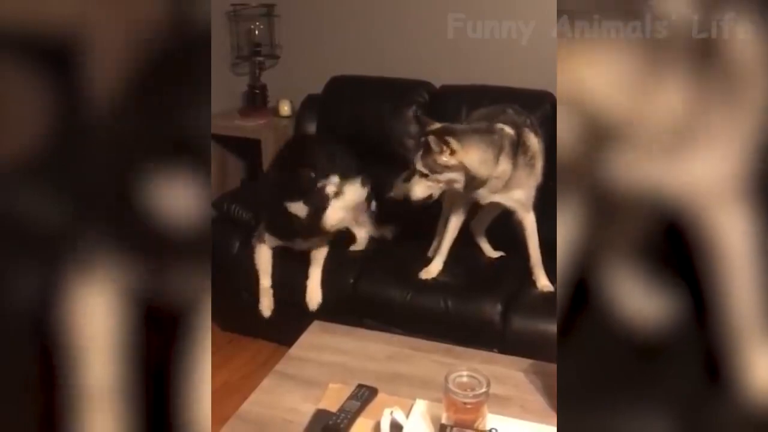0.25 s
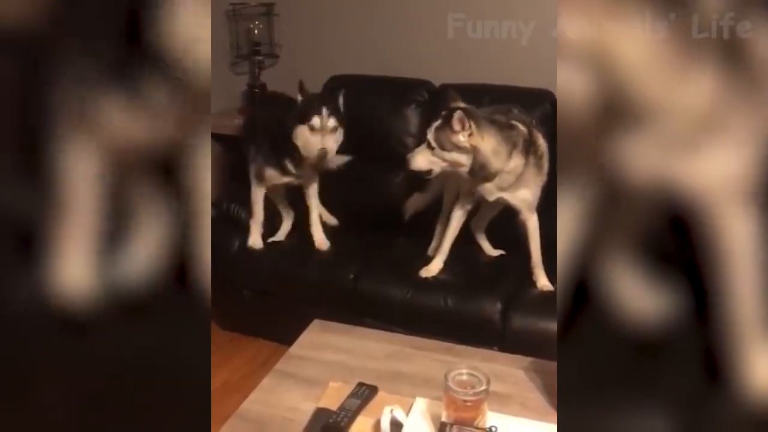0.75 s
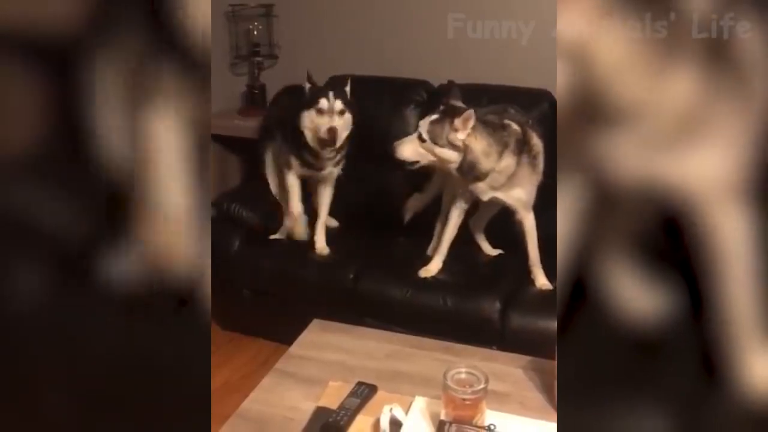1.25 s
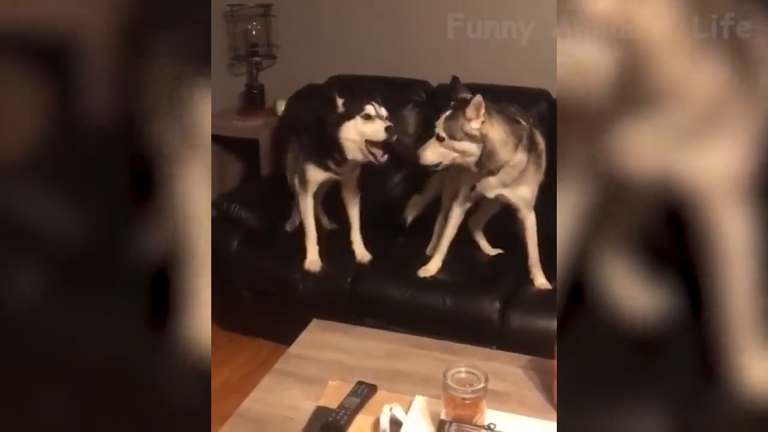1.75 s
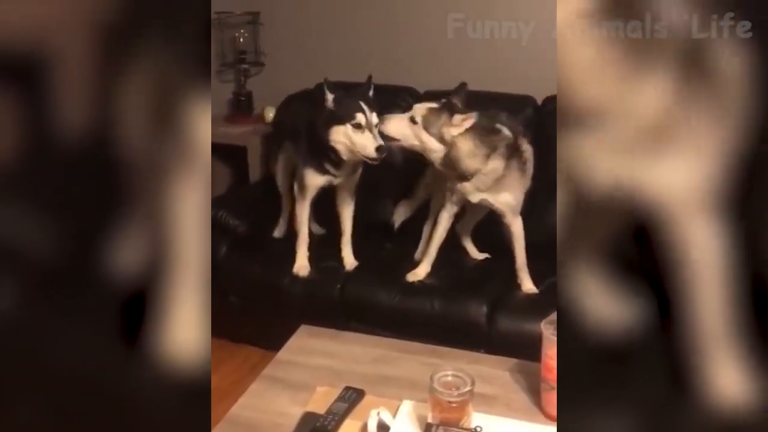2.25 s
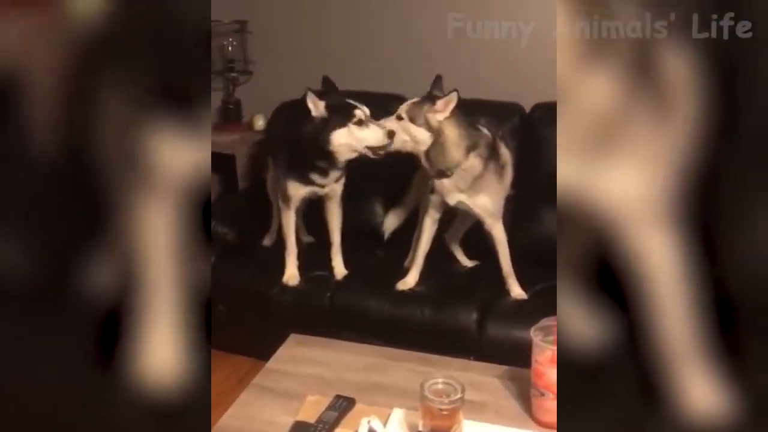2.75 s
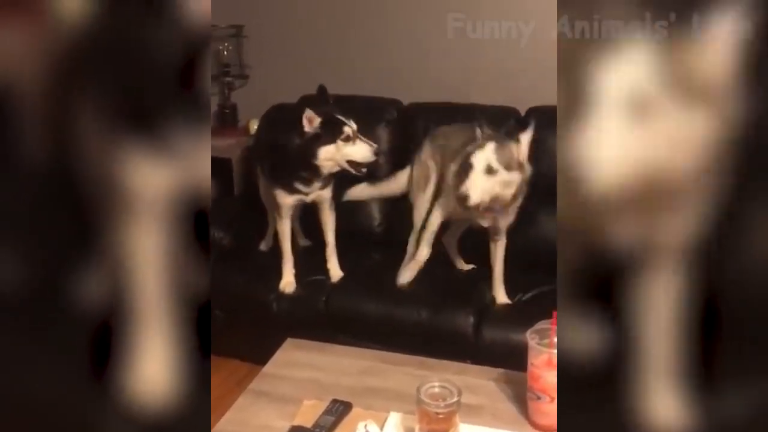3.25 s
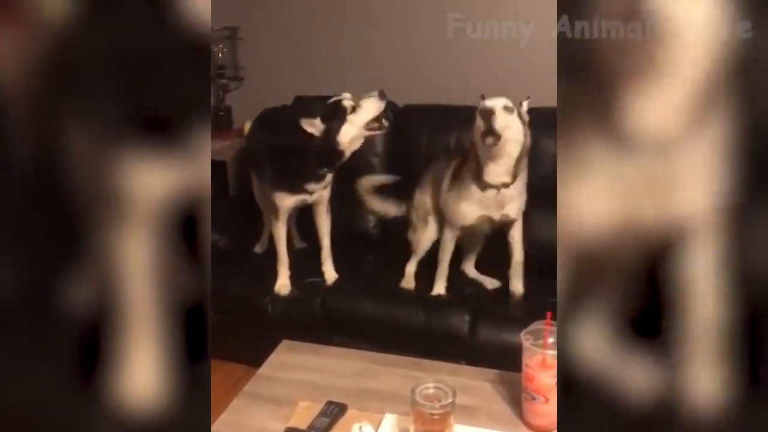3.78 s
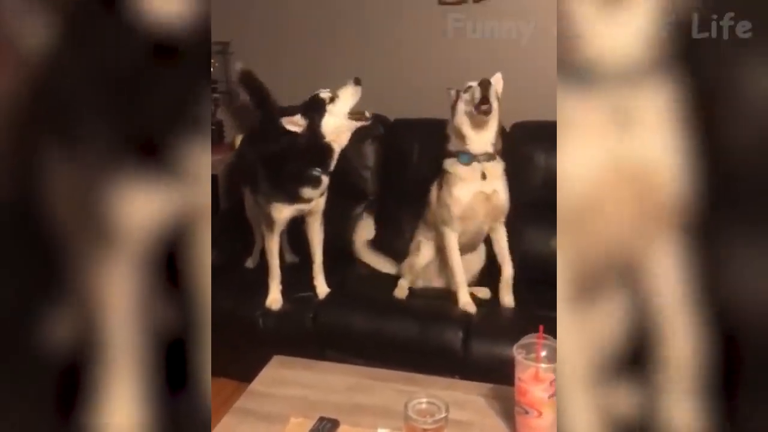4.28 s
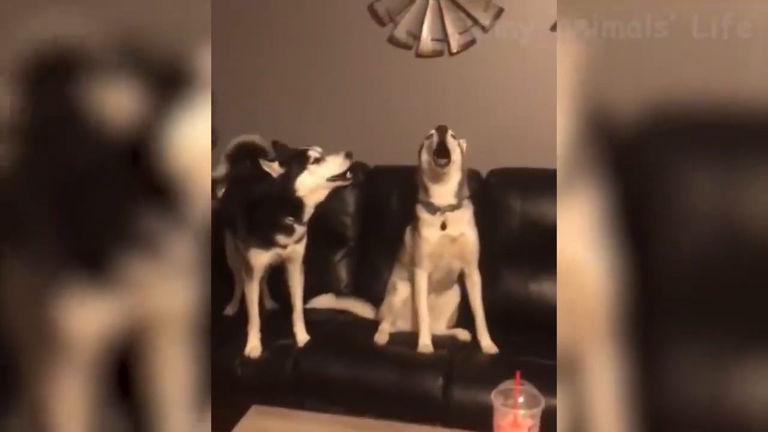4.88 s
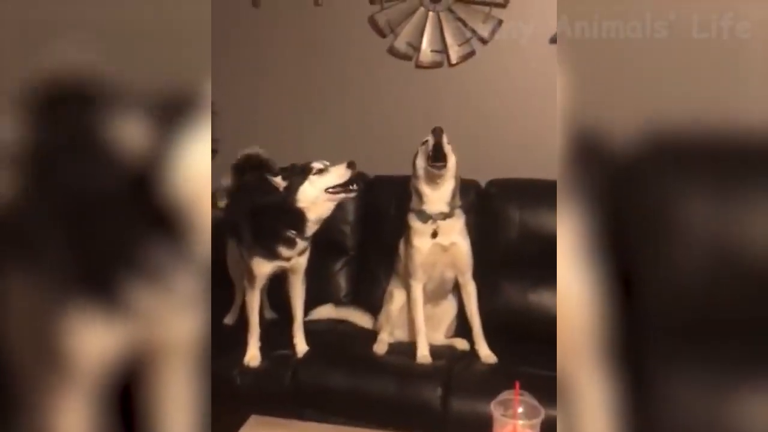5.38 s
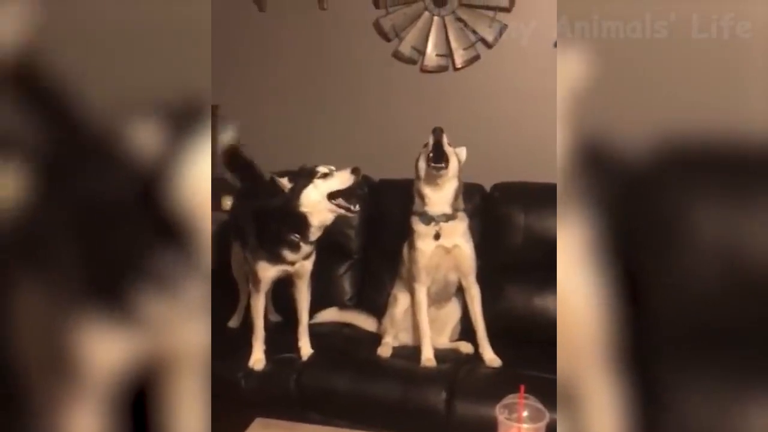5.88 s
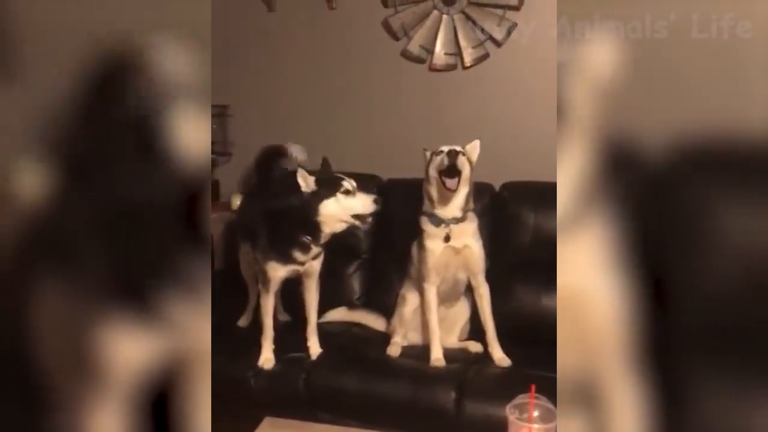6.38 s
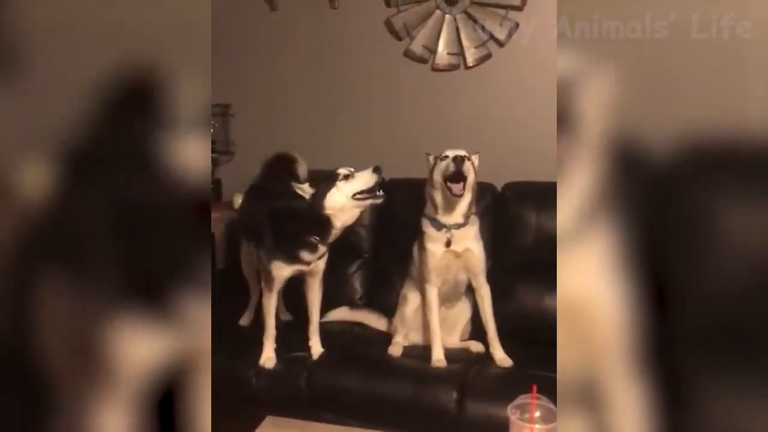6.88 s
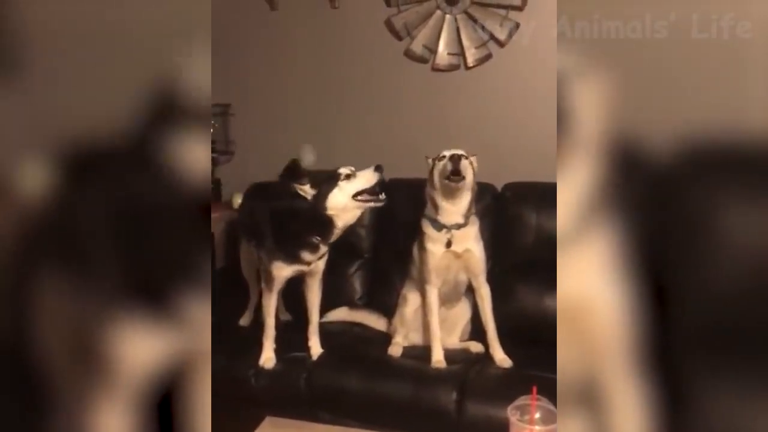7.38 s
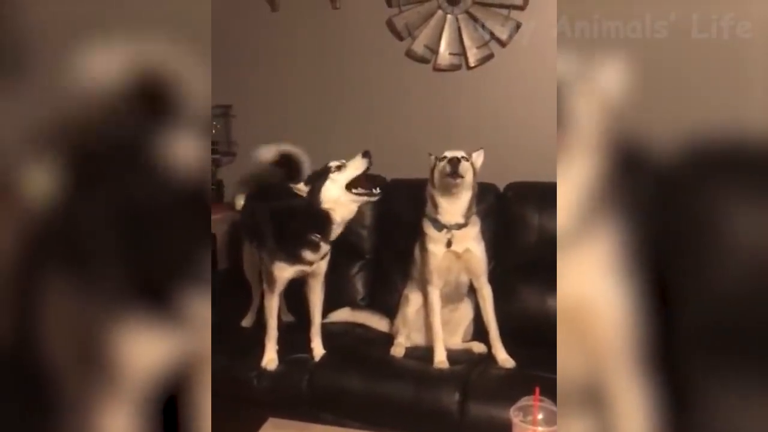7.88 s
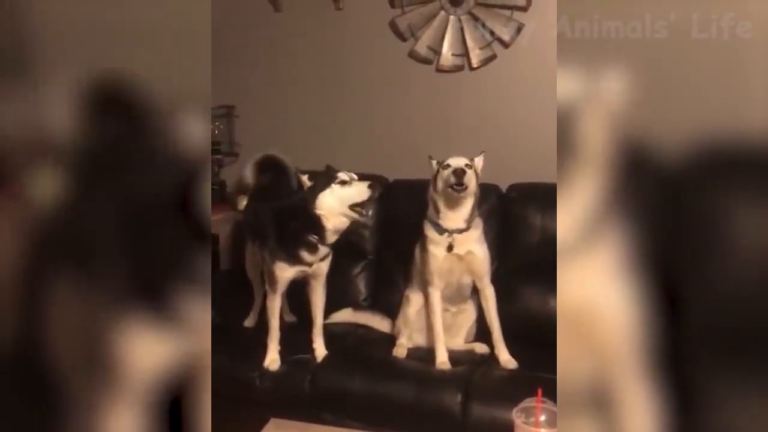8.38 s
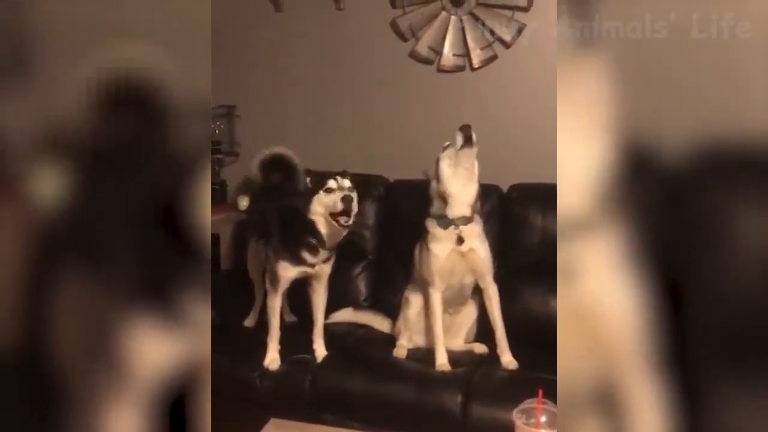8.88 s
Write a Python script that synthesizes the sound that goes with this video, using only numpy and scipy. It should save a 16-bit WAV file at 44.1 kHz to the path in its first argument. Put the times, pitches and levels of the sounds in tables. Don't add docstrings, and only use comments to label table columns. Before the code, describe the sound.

Close indoor sound of two excited dogs calling. Separate sharp yelps and husky snarls come first, with small gaps and a few thin whines. Then nearly continuous howling overlaps, a bright high voice arching above a lower, growly, unsteady one, each howl starting with a raspy bark. It breaks into closing yaps. Short room reverberation, very faint paw thuds on cushions, and loud peaks slightly squashed.

```python
import sys
import numpy as np
from scipy import signal
from scipy.fft import rfft, irfft, next_fast_len
from scipy.io import wavfile
from scipy.ndimage import uniform_filter1d, minimum_filter1d

SR = 44100
rng = np.random.default_rng(int(sys.argv[2]) if len(sys.argv) > 2 else 0)


def dump_mix(stems):
    frames = np.atleast_2d(stems).T
    limited = np.clip(frames, -1, 1)
    pcm = np.round(limited * 32767).astype(np.int16)
    wavfile.write(sys.argv[1], SR, pcm)


def natural_amplitude(level_db):
    exponent = np.asarray(level_db, float) / 20
    return 10 ** exponent


N = 403074

# (time [s], pitch [Hz], effort [dB])
CAUGHT_YELPS = [
    [(-.02, 620, -52), (0.001, 610.1, -40), (.02, 674, -29.5), (.034, 708, -40), (.048, 697, -32),
     (.076, 710, -32), (.1, 707, -47.5), (.14, 690, -64)],
    [(.81, 502.2, -31), (.836, 641, -30.5), (.86, 642, -35), (.9, 685, -33), (.935, 681, -41),
     (.965, 702.7, -60)],
    [(2.62, 478.4, -36), (2.65, 509, -28), (2.667, 593.4, -27), (2.68, 683, -26), (2.715, 687.3, -26.5),
     (2.76, 691, -28), (2.8, 695.5, -61)],
    [(.42, 539, -39), (.45, 644, -36), (.47, 695, -33), (.5, 698, -37), (.53, 687, -44), (.57, 681, -53)],
]
# (start [s], length [s], top pitch [Hz], last pitch [Hz], effort [dB])
SHORT_YELPS = [
    (1.39, 0.15, 686, 683.7, -22),
]
# (time [s], pitch [Hz], effort [dB])
WHIMPERS = [
    [(1.62, 624, -36.5), (1.664, 699, -30.5), (1.73, 736, -31.5), (1.87, 626, -49)],
    [(1.85, 625, -36), (1.938, 769.7, -26), (1.984, 755, -33.5), (2.06, 535, -42)],
    [(2.04, 594, -39), (2.108, 509, -47.5), (2.2, 523.5, -34.5), (2.266, 523.5, -27.5), (2.34, 508.7, -44)],
    [(3.28, 506.4, -64), (3.332, 621.7, -41), (3.37, 628, -33.5), (3.43, 609.7, -34), (3.49, 667, -23),
     (3.52, 708, -25), (3.54, 830.3, -18.5), (3.6, 831, -29), (3.66, 823, -46)],
]
# (time [s], pitch [Hz], effort [dB])
ARCHED_HOWLS = [
    [(3.79, 540, -21), (3.812, 650.5, -32.5), (3.826, 756.2, -32), (3.902, 793.4, -46), (3.982, 821, -44),
     (4.098, 850, -32), (4.2, 832, -41), (4.3, 765, -44.5)],
    [(4.44, 619.6, -29), (4.47, 641.8, -24.5), (4.515, 652, -22.5), (4.535, 776.6, -29), (4.62, 818.5, -38),
     (4.722, 867.6, -31), (4.924, 824.3, -42.5), (5.02, 855.6, -42)],
    [(5.125, 580.8, -34), (5.145, 651, -33.5), (5.19, 649.7, -31), (5.205, 771, -28.5),
     (5.27, 822.5, -39.5), (5.442, 870, -28.5), (5.546, 838, -32), (5.608, 786.3, -34.5),
     (5.73, 748, -42.5)],
    [(5.865, 583.7, -16), (5.88, 665.6, -22.5), (5.9, 673.5, -28), (5.912, 765, -24.5), (6.0, 795, -37),
     (6.1, 838.7, -30.5), (6.212, 859, -27.5), (6.382, 817, -32), (6.44, 666, -29.5)],
    [(7.79, 605.5, -28), (7.824, 640.7, -29.5), (7.87, 722, -34.5), (7.96, 775, -36.5),
     (8.074, 847.8, -28.5), (8.2, 829, -30), (8.32, 814, -28.5), (8.4, 782, -38.5), (8.44, 644, -34)],
]
# (time [s], pitch [Hz], effort [dB])
LONG_HOWL = [
    (6.6, 532.7, -34),
    (6.62, 664.2, -24.5),
    (6.7, 781.6, -34.5),
    (6.93, 847.5, -29),
    (7.15, 730.4, -32.5),
    (7.252, 769.6, -26.5),
    (7.266, 687.7, -28.5),
    (7.42, 674, -28.5),
    (7.55, 699.7, -24),
    (7.66, 660, -34),
]
# (time [s], pitch [Hz], effort [dB])
LAST_YAPS = [
    [(8.58, 499, -46), (8.61, 636.6, -24.5), (8.64, 711.5, -27.5), (8.69, 719.5, -38), (8.75, 739.6, -34.5),
     (8.8, 687.8, -45.5), (8.83, 668, -17)],
    [(8.81, 674.6, -46), (8.85, 685.7, -22.5), (8.875, 735.6, -21), (8.895, 823, -26.5), (8.94, 713, -25.5),
     (9.03, 676.7, -42.5), (9.1, 613, -47), (9.14, 685.5, -21)],
]
# (start [s], length [s], top pitch [Hz], last pitch [Hz], effort [dB])
GRUNTS = [
    (1.52, .32, 440, 380.6, -45.5),
    (8.84, 0.28, 562.9, 521, -23),
]
# (time [s], pitch [Hz], effort [dB])
SNARLS = [
    [(.15, 279.2, -51), (.21, 371.5, -41.5), (.27, 413, -49), (.33, 397.4, -40.5), (.38, 348, -38.5),
     (.43, 335, -53)],
    [(1.12, 270, -16), (1.145, 289.7, -26.5), (1.185, 415, -27.5), (1.22, 437.1, -21.5), (1.28, 414.7, -30),
     (1.36, 401, -33), (1.41, 392.5, -27.5)],
    [(2.27, 272.3, -36), (2.3, 330.5, -34.5), (2.33, 419.7, -31.5), (2.38, 434, -31), (2.43, 400.2, -31.5),
     (2.5, 383.9, -53), (2.56, 379.7, -48)],
]
# (time [s], pitch [Hz], effort [dB])
RISING_HOWLS = [
    [(2.92, 270.2, -27), (2.97, 344, -28), (3.02, 409.4, -23), (3.1, 414, -28.5), (3.15, 452.7, -25.5),
     (3.28, 460.5, -19), (3.33, 427.5, -24), (3.4, 405.4, -24), (3.47, 419.5, -30)],
    [(3.44, 415.8, -48), (3.5, 485.7, -16), (3.56, 505, -18), (3.66, 511.7, -42.5), (3.705, 488.8, -29),
     (3.73, 458.6, -24.5), (3.83, 487.5, -21.5), (3.9, 451.6, -43.5), (4.0, 414, -39)],
    [(4.0, 410.3, -27.5), (4.06, 547.8, -35), (4.19, 566.4, -48.5), (4.27, 453.2, -32.5),
     (4.35, 443.6, -35), (4.41, 459, -22.5), (4.47, 444.8, -38)],
    [(4.45, 447.6, -27), (4.6, 449.4, -26), (4.75, 436.3, -32), (4.85, 437, -32.5), (4.97, 457.7, -24),
     (5.07, 478, -21.5), (5.17, 488.1, -24), (5.26, 425.7, -37.5), (5.42, 434.2, -20.5)],
]
SINKING_HOWLS = [
    [(5.45, 432.2, -12), (5.52, 412.8, -28), (5.732, 413.5, -39.5), (5.778, 455, -34.5), (5.87, 473, -17.5),
     (5.924, 432, -45), (6.058, 481.8, -25.5), (6.47, 425, -32), (6.62, 448.4, -26)],
    [(6.68, 406.6, -32.5), (6.91, 419.6, -32), (6.94, 390, -29), (7.03, 352.9, -29.5), (7.3, 379.6, -30),
     (7.526, 374.9, -40.5), (7.606, 343, -41), (7.722, 369.4, -30.5), (7.78, 494.2, -19.5),
     (7.9, 479.6, -28)],
]
# (time [s], pitch [Hz], effort [dB])
HUM = [
    (7.88, 384.7, -45),
    (7.93, 372, -43),
    (8.0, 362.3, -56),
    (8.06, 362, -58),
]

HIGH_ROUGHNESS = [.8, 2.8, 3., .8, 2.2, .9, .5, .4, 1.2, 1.5, .7, .55, .45, .13, .4, 1.4, 1.]
LOW_ROUGHNESS = [2., 1., 1.2, 1., 1.2, .7, .9, .9, .7, .7, .7, .6]
# (start [s], end [s], depth [1])
HIGH_GROWLS = [(0.091, 0.084, 0.076), (0.816, 0.89, 0.17), (1.449, 1.58, 0.18), (1.688, 1.84, 0.069),
               (2.622, 2.7, 0.5), (3.542, 3.75, 0.31), (3.826, 4.44, 0.099), (4.485, 4.82, 0.24),
               (5.195, 5.26, 0.13), (5.904, 5.957, 0.079), (6.63, 6.68, 0.13), (7.84, 7.48, 0.97),
               (8.61, 8.78, 0.13), (8.858, 9.6, 0.15)]
LOW_GROWLS = [(0.255, 0.415, 0.52), (1.202, 1.346, 0.14), (1.524, 1.832, 2.44), (2.351, 2.56, 0.99),
              (2.915, 3.08, 0.54), (3.327, 3.468, 0.4), (3.588, 3.714, 1.03), (3.898, 4.038, 0.61),
              (4.426, 4.767, 0.78), (5.039, 5.165, 0.77), (5.431, 5.758, 0.45), (6.032, 6.2, 0.24),
              (6.413, 6.596, 0.14), (6.935, 7.063, 0.074), (7.378, 7.574, 0.26), (8.901, 8.981, 0.13)]
HIGH_CLOSED = [16, 9, 6, 12, 6, 9, 2, -6.5, -3.5, 8.5, 3, 0, 7, -0.5, -3.5, 5.5, -8.5]
LOW_CLOSED = [-2.5, -2, 9, 2, 6.5, 2.5, 7, -1, 2, -5, -12, 3]
# (pitch [Hz], level over the effort [dB])
HIGH_FIRST = [(520, -4.5), (640, -4.5), (700, 3), (780, 11.5), (825, 11), (870, 0.5)]
LOW_FIRST = [(300, -14), (400, -8), (450, -8), (490, -11), (570, 17)]
# (frequency [Hz], level [dB])
HIGH_MOUTH = [(1800, 10.5), (2600, 8.5), (3300, -9), (3900, -23), (4600, -24.5), (6200, -16), (8500, -25),
              (11500, -29.5)]
LOW_MOUTH = [(1000, 2), (1300, -2.5), (1800, -8), (2600, -2.5), (3200, -21), (3900, -32.5), (6000, -28.5),
             (11500, -51.5)]
# (time [s], level [dB])
HIGH_MUZZLE = [(3.3, -33), (3.57, 3), (3.839, 3.5), (3.952, 2.5), (4.3, -5), (4.5, -11), (4.92, 9),
               (5.02, -8), (5.27, -6), (5.56, 5.5), (5.9, -10), (6.38, -10), (6.65, 3.5), (7.2, 2),
               (7.41, -9.5), (7.831, 11), (8.07, -6), (8.31, 0.5)]
LOW_MUZZLE = [(2.4, -13), (3.0, 3), (3.192, -1), (3.5, -8), (3.8, 7.5), (4.15, 9.5), (4.36, 14),
              (4.55, -17.5), (4.85, 8), (5.1, -7), (5.45, -7), (5.75, 2), (5.92, -5.5), (6.1, -7), (6.6, 6),
              (6.8, 8), (7.101, 2), (7.7, 15.5)]
# (time [s], level [dB])
HIGH_GAPE = [(1.901, 1), (2.1, -8.5), (2.3, -19.5), (3.3, 16.5), (3.5, -5.5), (3.9, 4), (4.2, 4), (4.5, -3),
             (4.9, 4), (5.3, 2), (5.7, 2.5), (6.2, -2.3), (6.8, -4.5), (7.3, -3), (7.6, -3), (8.1, -1.5),
             (8.65, -3), (9.0, -9)]
LOW_GAPE = [(.3, 7), (1.15, 6.5), (1.3, -2), (2.35, 2), (3.0, 0.5), (3.201, -4.5), (3.5, 12), (3.8, -5.5),
            (4.35, -6), (4.6, -16), (4.9, -8), (5.3, -6), (5.8, 1.5), (6.3, -4.5), (6.9, -0.5), (7.4, -1),
            (7.77, -3.5), (9.0, -3)]

# (time [s], peak level [dB], length [s])
BARKS = [(.0094, -9.5, 0.03), (0.195, -15, 0.19), (0.417, -17, 0.12), (0.79, -5.5, 0.11),
         (1.132, -2.5, 0.15), (1.364, -2.5, 0.15), (1.648, -12, 0.073), (2.308, -2.5, 0.11),
         (2.623, 1, 0.086), (2.908, -10, 0.16), (3.266, -5.5, 0.084), (3.47, -7.5, 0.25), (3.801, 2, 0.065),
         (4.045, -16, 0.2), (4.438, -1.5, 0.083), (4.634, -20, 0.082), (5, -4.5, 0.2), (5.151, -4, 0.082),
         (5.426, -25, 0.14), (5.691, -18, 0.095), (5.86, -4.5, 0.1), (6.373, -26, 0.17),
         (6.575, -1.5, 0.12), (6.928, -32, 0.076), (7.334, -16, 0.061), (7.7746, 1, .11),
         (8.371, -41, 0.085), (8.559, -3.5, .13), (8.826, -6, 0.15), (9.087, -15, 0.12)]
BURST_HISS = [-44, -54, -89, -46, -63, -31.5, -59, -58.5, -34, -59, -58, -44.5, -51, -68, -52.5, -41.5, -45,
              -59, -64, -50.5, -42.5, -49, -39.5, -74, -51, -42.5, -52, -46, -37, -42]
BURST_BRIGHT = [7, -6.5, 2.5, 0, -4, 3.5, 5.5, -12.5, 2, -3, -5.5, -17, -0.5, 2, -7.3, -21, -17, -3, 3, 1,
                -1.5, -3, -4, -1, -3, -6, 25, -2.5, -1, 4]
# (frequency [Hz], width [Hz], level [dB])
THROAT = [(668, 102, 3.5), (1184, 262, 1), (1930, 188, -0.5), (2538, 165, -1.5), (3310, 640, -12.5)]
# (frequency [Hz], density [dB per Hz])
HISS = [(2120, -54.5), (3600, -26.5), (3940, 12.5), (4370, 3.5), (4880, 1), (6290, 10), (7330, 0),
        (12100, -3), (15700, -60), (22000, -120)]
# (time [s], level [dB], length [s])
LUNGES = [(.0094, -37, 0.07), (0.44, -50, 0.088), (0.81, -40, 0.098), (1.402, -30.5, 0.1),
          (2.602, -34, 0.15), (3.3, -60, 0.11), (3.494, -48, 0.19), (3.802, -37.5, 0.13),
          (5.88, -41, 0.067), (6.616, -44, 0.13), (7.787, -38.5, 0.14), (8.843, -35, 0.093)]
# (time [s], length [s], first frequency [Hz], last frequency [Hz], level [dB])
NOSE = [
    (1.41, .09, 4650, 4150, -31),
    (2.64, .08, 4350, 4200, -40),
    (.84, .07, 4400, 4300, -47),
    (1.67, .07, 4350, 4300, -48),
]
# (time [s], frequency [Hz])
POCKET = [(.15, 3800), (.9, 3860), (1.2, 3480), (1.36, 3560), (1.43, 4066), (2.1, 4070), (2.3, 3477),
          (2.45, 3700), (3.0, 4000), (3.45, 3632), (4.4, 3640), (5.1, 3730), (5.74, 3506), (6.2, 3713),
          (7.0, 3653), (7.7, 3694), (8.4, 3625), (8.7, 4037)]
# (frequency [Hz], time [s])
ROOM_T60 = [(200, 0.72), (700, 0.45), (2500, 0.43), (6000, 0.35), (11000, 0.24)]
# (middle [s], level [dB], spread [s])
SHUFFLES = [
    (1., -67.5, 0.93),
    (2.5, -68.5, 0.62),
    (3.45, -63, 0.57),
    (4.7, -71, 0.3),
    (6.7, -81, 0.18),
    (7.8, -74.5, 0.72),
]
# (frequency [Hz], density [dB per Hz])
AIR = [(30, -16), (100, -2.5), (300, -11.5), (1000, 6.5), (3000, -9), (10000, -37)]

SCOOP, RISE_S, ONSET_DB = .27, .035, -1
HOLD, HOLD_DB, RELEASE_DB = .65, -5, -30
CRACK_ROUGH, CRACK_S = 1.5, .06
GLIDE_S = .02
BRIGHTEN, BRIGHT_FROM_DB = .11, -34.5
HIGH_ORDER, LOW_ORDER = .2, .7
LOW_SMEAR = .65
RASP_SPLIT_HZ = 1380
STREAK_DB = -8.5
HISS_PATCH_DB = 3
BURST_RISE = .7
NOSE_WIDTH_HZ, POCKET_WIDTH_HZ = 81, 440
ROOM_DB, AIR_DB = -5, -57
CREAK_DB = -89
CEILING = .68


def high_dog():
    return voice(high_calls(), HIGH_ROUGHNESS, HIGH_CLOSED, HIGH_FIRST, HIGH_MUZZLE, HIGH_GAPE,
                 HIGH_GROWLS, HIGH_MOUTH, gape_share=1.0, first_share=.92, third_share=.11,
                 third_db=-1.0, upper_db=-1.13, swell_s=.019, breath_db=-35.0, haze_db=2.5,
                 shimmer_db=2.0, blur_db=.4, count=16, order=4)


def low_dog():
    return voice(low_calls(), LOW_ROUGHNESS, LOW_CLOSED, LOW_FIRST, LOW_MUZZLE, LOW_GAPE,
                 LOW_GROWLS, LOW_MOUTH, gape_share=.1, first_share=.8, third_share=.82,
                 third_db=-10.5, upper_db=0, swell_s=.03, breath_db=-29.0, haze_db=2.0,
                 shimmer_db=2.5, blur_db=1.4, count=19, order=3)


def voice(calls, roughness, closed, first, muzzle, gape, growls, mouth, gape_share, first_share,
          third_share, third_db, upper_db, swell_s, breath_db, haze_db, shimmer_db, blur_db, count, order):
    tremble, shimmer, wander = drift(76.0), natural_amplitude(shimmer_db * drift(22.6)), drift(24.4)
    growl = growl_depth(growls)
    patches_db = 4 * drift(9.9)
    patchwork_db = np.r_[patches_db, patches_db[::-1]]
    flutter = np.r_[shimmer[::-1], shimmer] ** 1.1
    haze = natural_amplitude(haze_db + patches_db[::-1]) * coloured([(1500, -61.5)] + HISS)
    breath = through_throat(rng.standard_normal(N)) + haze
    out = np.zeros(N)
    for rows, rough, closed_db in zip(calls, roughness, closed):
        s, *columns = np.transpose(rows)
        span = slice(max(round(s[0] * SR), 0), min(round(s[-1] * SR), N))
        t = np.arange(span.start, span.stop) / SR
        hz, effort_db = [np.interp(t, s, c) for c in columns]
        hz = uniform_filter1d(hz, size=round(GLIDE_S * SR), mode="nearest")
        cracked = np.abs(rough) * (1 + CRACK_ROUGH * np.exp(-(t - s[0]) / CRACK_S))
        phase = 2 * np.pi * np.cumsum(hz * (1 + cracked / 100 * tremble[span])) / SR

        moved_db = np.interp(t, *np.transpose(muzzle), left=0, right=0)
        gape_db = np.interp(t, *np.transpose(gape))
        first_partial_db = effort_db + closed_db + at_hz(first, hz) + first_share * moved_db
        third_partial_db = effort_db + third_db + third_share * moved_db + gape_share * gape_db
        third_partial_db = third_partial_db - blur_db * np.abs(np.gradient(hz)) * SR / hz
        bright_db = upper_db + (1 - gape_share) * gape_db + BRIGHTEN * (effort_db - BRIGHT_FROM_DB)
        levels_db = [first_partial_db, effort_db, third_partial_db]
        for k in range(4, count):
            mouth_db = at_hz(mouth, k * hz) - at_hz(mouth, 3 * hz)
            patch_db = patchwork_db[span.start + k * 9001:span.stop + k * 9001]
            levels_db.append(third_partial_db + bright_db + mouth_db + patch_db)

        tone = 0
        for k, db in enumerate(levels_db):
            own_flutter = flutter[span.start + k * 23003:span.stop + k * 23003]
            tone = tone + natural_amplitude(db) * np.sqrt(2) * np.sin((k + 1) * phase + k * k) * own_flutter
        group = phase / order + wander[span]
        tone = tone * (1 + growl[span] * (np.cos(group) + .71 * np.cos(2 * group)))
        puffs = natural_amplitude(effort_db + breath_db) * np.abs(rough) * breath[span] * (1 + .27 * np.cos(phase))
        fade = np.clip(np.minimum((t - s[0]) / swell_s, (s[-1] - t) / .02), 0, 1) ** 2
        out[span] += (tone * shimmer[span] ** .47 + puffs) * fade
    return out


def growl_depth(growls):
    points = []
    for start, end, depth in growls:
        full = start + min(.05, (end - start) / 3)
        points += [(start - .02, 0), (full, depth), (end - .02, depth), (end + .02, 0)]
    return np.interp(np.arange(N) / SR, *np.transpose(points)) * natural_amplitude(3.3 * drift(4.66))


def high_calls():
    return CAUGHT_YELPS + short_calls(SHORT_YELPS) + WHIMPERS + ARCHED_HOWLS + [LONG_HOWL] + LAST_YAPS


def low_calls():
    return short_calls(GRUNTS) + SNARLS + RISING_HOWLS + SINKING_HOWLS + [HUM]


def short_calls(rows):
    calls = []
    for s, length, hz, last_hz, db in rows:
        held = s + max(HOLD * length, RISE_S + .01)
        calls.append([(s, hz * (1 - SCOOP), db + ONSET_DB),
                      (s + RISE_S, hz, db),
                      (held, (hz + last_hz) / 2, db + HOLD_DB),
                      (s + length, last_hz, db + RELEASE_DB)])
    return calls


def barks():
    pitch = barking_pitch()
    slaps = fold_slaps(pitch)
    rasp = through_throat(slaps - slaps.mean())
    muffled = filtered(rasp, 6, 2950)
    rasp = muffled + np.clip(uniform_filter1d(pitch, size=2000) / 150 - 3, 0, 1) * (rasp - muffled)
    bright, dull = filtered(rasp, 2, RASP_SPLIT_HZ, "high"), filtered(rasp, 2, RASP_SPLIT_HZ)
    hiss = teeth_hiss(slaps)
    out = np.zeros(N)
    for (s, peak_db, length), hiss_db, bright_db in zip(BARKS, BURST_HISS, BURST_BRIGHT):
        span, shape = burst(s, length)
        burst_rasp = natural_amplitude(peak_db - 13.5) * (dull[span] - natural_amplitude(bright_db) * bright[span])
        out[span] += shape * (burst_rasp + natural_amplitude(hiss_db) * hiss[span])
    return out * natural_amplitude(2 * drift(20.1))


def barking_pitch():
    t = np.arange(N) / SR
    low = np.array(sorted(sum(low_calls(), [])))
    hz = np.interp(t, low[:, 0], low[:, 1])
    for s, call_hz, effort_db in map(np.transpose, high_calls()):
        span = slice(max(round(s[0] * SR), 0), round(s[-1] * SR))
        hz[span] = np.interp(t[span], s, call_hz)
    return hz


def fold_slaps(pitch):
    beats = np.floor(np.cumsum(pitch * (1 + .025 * drift(150))) / SR)
    chance = rng.uniform(-1, 1, N)
    low = pitch < 500
    order = np.where(pitch > 500, HIGH_ORDER, LOW_ORDER)
    beat_of_three = beats.astype(int) % 3
    slow = rms_one(uniform_filter1d(chance, size=1500))
    grouped = .6 * slow[(np.arange(N) + beat_of_three * 50021) % N]
    slaps = np.diff(beats, prepend=0) * (.8 + order * grouped + np.sqrt(1 - order ** 2) * chance)
    turbulence = low * LOW_SMEAR * np.sqrt(pitch / SR) * chance[::-1]
    return (slaps + turbulence) / np.where(low, np.hypot(1, LOW_SMEAR), 1)


def teeth_hiss(slaps):
    spectrum = [(1500, -60)] + HISS
    hiss = rms_one(coloured(spectrum) + natural_amplitude(STREAK_DB) * coloured(spectrum, slaps))
    chance = rng.uniform(-1, 1, N)
    patches = natural_amplitude(HISS_PATCH_DB * rms_one(uniform_filter1d(uniform_filter1d(chance, size=400), size=400)))
    out = 0
    for low_hz in 3000 * 1.3 ** np.arange(7):
        band = filtered(hiss, 2, [low_hz, low_hz * 1.26], "band")
        out = out + np.roll(patches, round(low_hz) * 7) * band
    return out


def through_throat(x):
    out = 0
    for k, (hz, width_hz, db) in enumerate(THROAT):
        r = np.exp(-np.pi * width_hz / SR)
        poles = [1, -2 * r * np.cos(2 * np.pi * hz / SR), r * r]
        out = out + (-1) ** k * natural_amplitude(db) * signal.lfilter([1 - r * r, 0, r * r - 1], poles, x)
    return rms_one(filtered(out, 3, [380, 3300], "band"))


def burst(s, length):
    start = round(s * SR)
    u = np.arange(min(round(.4 * SR), N - start)) / SR / max(length, .02)
    rise = np.sin(np.pi / 2 * np.clip(u / BURST_RISE, 0, 1)) ** 2
    return slice(start, start + len(u)), rise * np.exp(-u ** 3)


def nose():
    out, wobble = np.zeros(N), drift(NOSE_WIDTH_HZ)
    for s, length, first_hz, last_hz, db in NOSE:
        span, shape = burst(s, length)
        hz = np.interp(np.arange(len(shape)) / SR, [0, 1.2 * length], [first_hz, last_hz])
        whistle = wobble[span] * np.sin(2 * np.pi * np.cumsum(hz) / SR)
        out[span] += natural_amplitude(db) * np.sqrt(shape) * whistle
    return out


def pocket(x):
    out, state, size = np.zeros(N), np.zeros((2, 2)), 1024
    for i in range(0, N, size):
        hz = np.interp(i / SR, *np.transpose(POCKET))
        notch = np.concatenate(signal.iirnotch(hz, hz / POCKET_WIDTH_HZ, fs=SR))
        out[i:i + size], state = signal.sosfilt([notch, notch], x[i:i + size], zi=state)
    return out


def chest_air():
    push = coloured([(20, -5.0), (60, -4.0), (150, -7.0), (300, -15.0)])
    out = np.zeros(N)
    for s, push_db, length in LUNGES:
        span, shape = burst(s, length)
        out[span] += shape ** 2 * natural_amplitude(push_db) * push[span]
    return out


def living_room(x):
    size = next_fast_len(N + SR // 2, True)
    hz = np.fft.rfftfreq(size, 1 / SR)
    t60 = np.maximum(at_hz(ROOM_T60, hz), .05)
    answer = 0
    for k, lag in enumerate(rng.uniform(.014, .05, 12)):
        loop = natural_amplitude(-60 * lag / t60) * np.exp(-2j * np.pi * hz * lag)
        answer = answer + (-1) ** k * loop / (1 - loop)
    for lag in (.0017, .0049):
        delay = np.exp(-2j * np.pi * hz * lag)
        answer = answer * (delay - .6) / (1 - .6 * delay)
    return irfft(rfft(x, size) * answer, size)[:N] / np.sqrt(12)


def cushions():
    t = np.arange(N) / SR
    busy = natural_amplitude(CREAK_DB)
    for middle, db, spread in SHUFFLES:
        busy = busy + natural_amplitude(db) * np.exp(-((t - middle) / spread) ** 2)
    thud = coloured([(20, -17.5), (60, 7.5), (200, 4.0), (400, -22.5)])
    return busy * natural_amplitude(.82 * drift(8.6)) * thud


def room_hush():
    return natural_amplitude(AIR_DB) * coloured(AIR)


def coloured(spectrum, source=None):
    size = next_fast_len(N, True)
    gain = natural_amplitude(at_hz(spectrum, np.fft.rfftfreq(size, 1 / SR)))
    if source is None:
        source = rng.standard_normal(size)
    return rms_one(irfft(rfft(source, size) * gain, size)[:N])


def drift(rate_hz):
    return rms_one(filtered(rng.standard_normal(N + SR), 4, rate_hz)[SR:])


def filtered(x, order, hz, kind="low"):
    return signal.sosfilt(signal.butter(order, hz, kind, fs=SR, output="sos"), x)


def at_hz(points, hz):
    point_hz, level = np.transpose(points)
    return np.interp(np.log(hz + 1), np.log(point_hz), level)


def rms_one(x):
    return x / np.sqrt(np.mean(x ** 2) + 1e-20)


def scene():
    dogs = natural_amplitude(1.5) * high_dog() + natural_amplitude(-3.0) * low_dog() + barks() + nose()
    dogs = filtered(dogs, 5, 270, "high")
    in_room = pocket(dogs + natural_amplitude(ROOM_DB) * living_room(dogs))
    return (in_room + chest_air() + cushions() + room_hush())[None]


def roll_off(x):
    return signal.sosfilt(signal.butter(12, 12260, fs=SR, output="sos"), x)


def record(dry):
    gain = minimum_filter1d(CEILING / np.maximum(np.abs(dry), CEILING), size=90)
    limited = dry * uniform_filter1d(gain, size=90)
    mix = signal.sosfilt(signal.cheby2(10, 50, 12800, fs=SR, output="sos"), limited)
    return roll_off(mix)


dry = scene()
out = record(dry)
dump_mix(out)
```